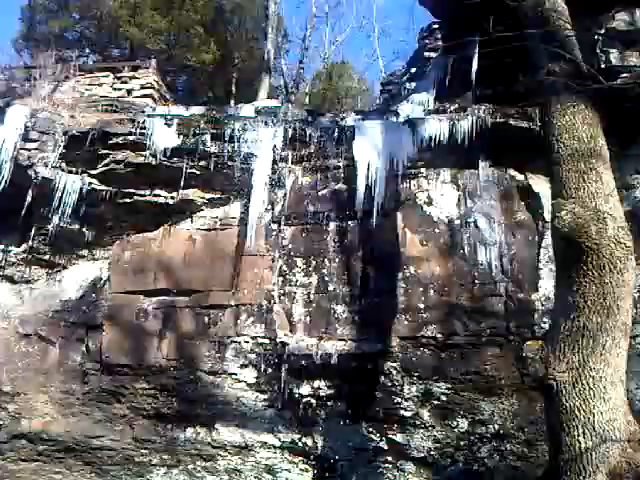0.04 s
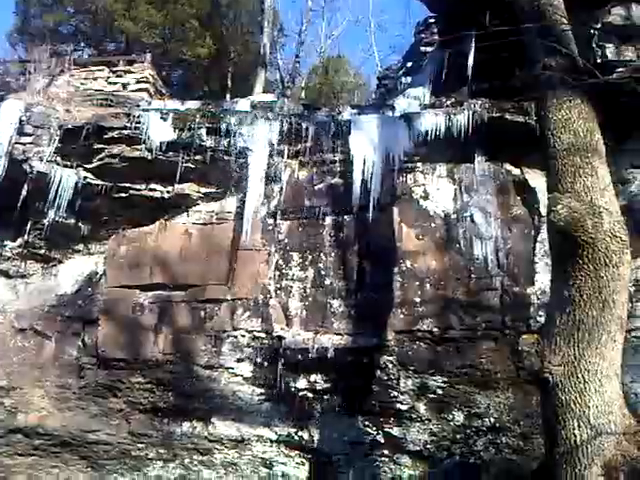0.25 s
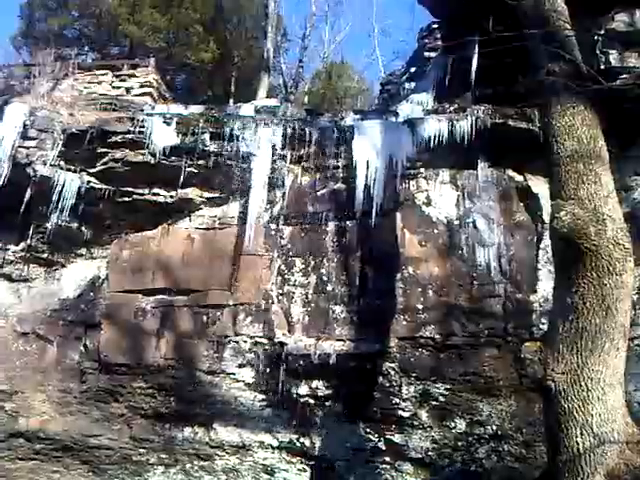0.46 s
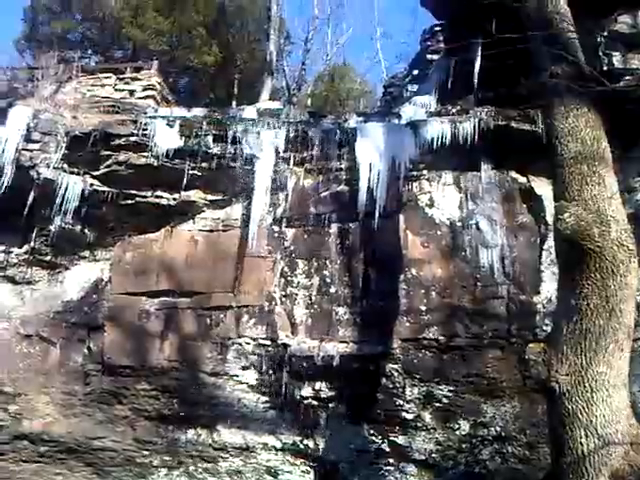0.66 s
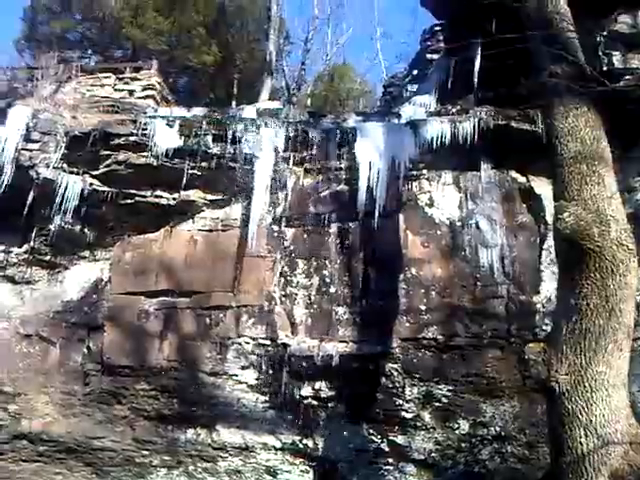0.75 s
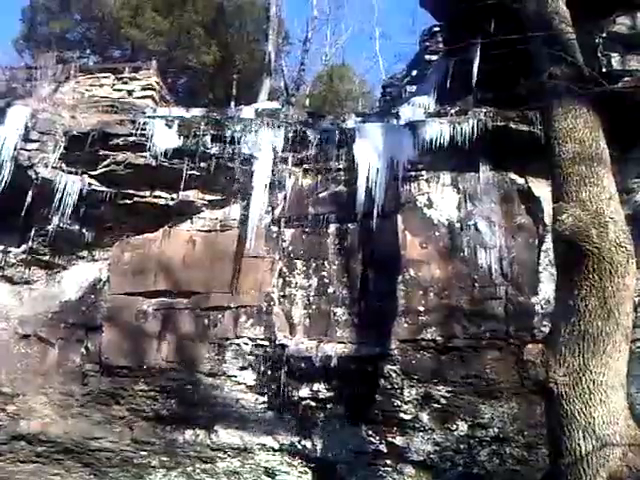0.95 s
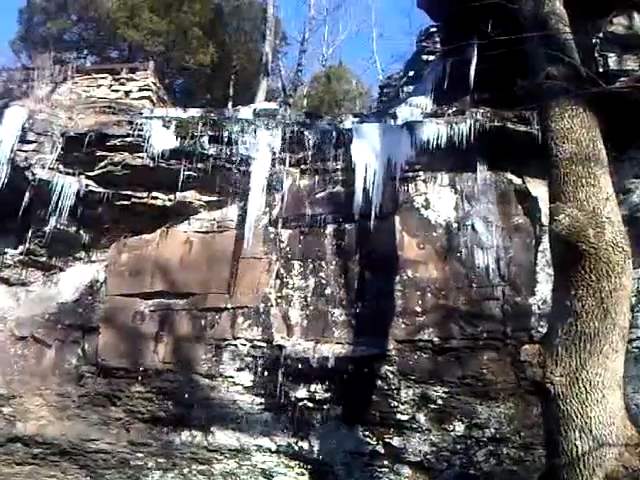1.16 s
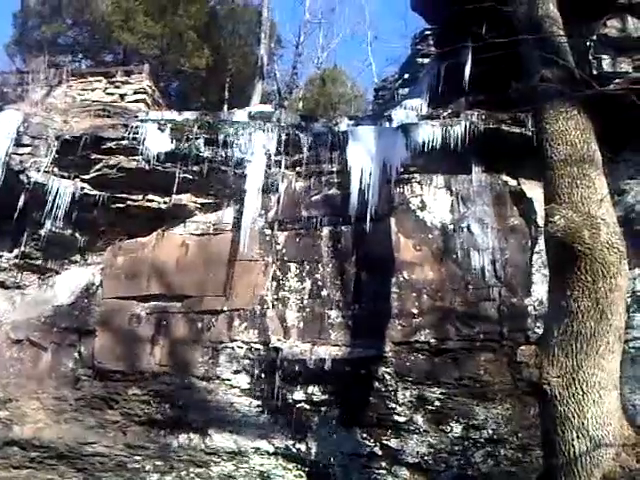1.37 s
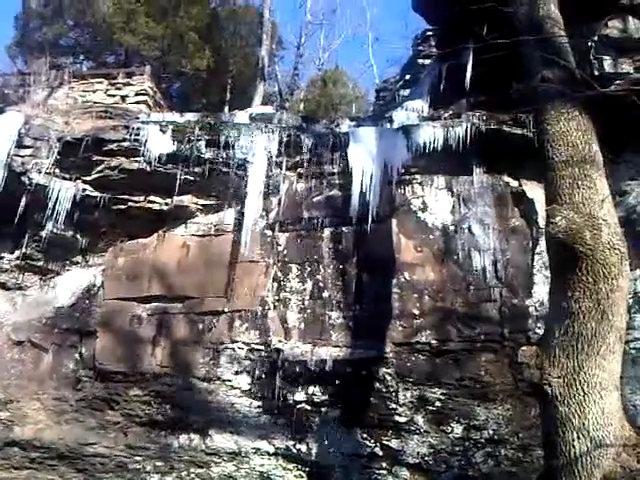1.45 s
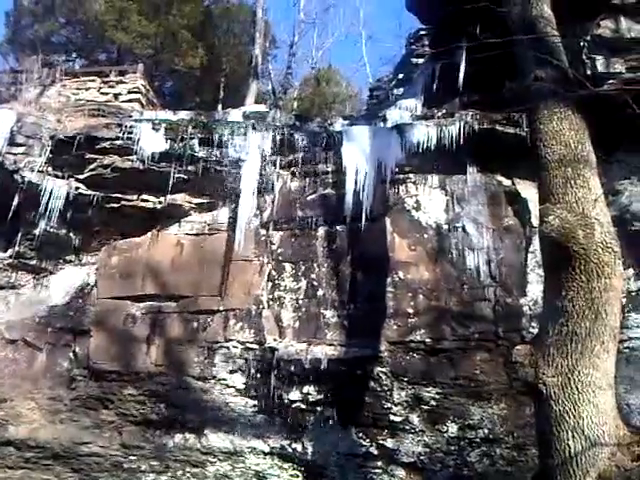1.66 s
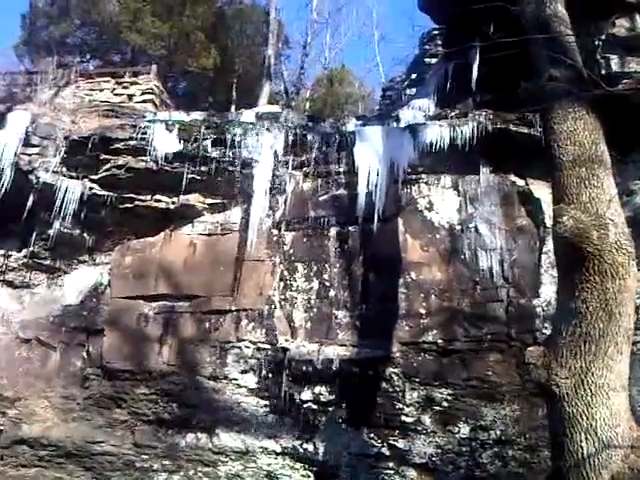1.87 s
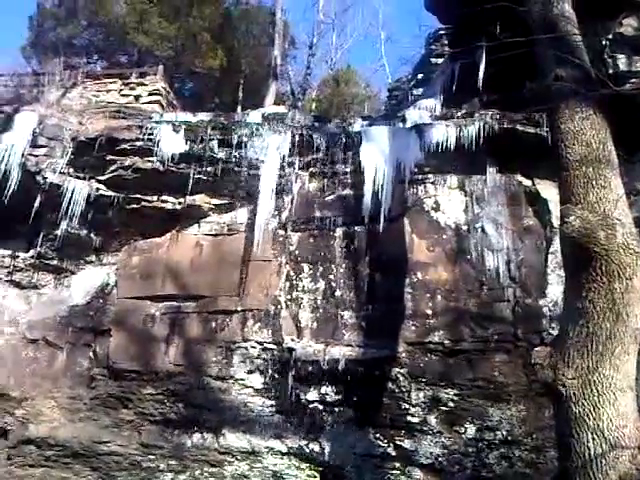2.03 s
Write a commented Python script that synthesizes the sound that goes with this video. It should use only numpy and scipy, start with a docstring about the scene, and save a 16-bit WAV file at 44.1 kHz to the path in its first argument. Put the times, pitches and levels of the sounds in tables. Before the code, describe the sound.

Steady waterfall noise at a rocky cliff, heard through a small camera microphone: silence first, a low soft thump as the sound opens, then quiet, even rushing water with dense fine spatter and occasional sharper drops.

```python
"""At a rocky cliff a thin waterfall drops past a camera microphone: steady rush, dense spatter, louder splats.
The microphone opens a moment after the start, as a finger bumps the camera body with a short dull thump.
The rush is coloured, patchy noise in a low and a high band; spatter and splats are short bursts of noise.
The thump is a set of brief pushes and pulls passed through a heavily damped resonance."""
import sys
import numpy as np
from scipy import signal
from scipy.fft import rfft, irfft, next_fast_len
from scipy.io import wavfile
from scipy.ndimage import uniform_filter1d, map_coordinates

SR = 44100
rng = np.random.default_rng(int(sys.argv[2]) if len(sys.argv) > 2 else 0)


def waveform_to_disk(signal):
    """Save audio, clipped to [-1, 1], as 16-bit WAV at the path in sys.argv[1]."""
    frames = np.transpose(np.atleast_2d(signal))
    scaled = np.clip(frames, -1, 1) * 32767
    samples = np.round(scaled).astype(np.int16)
    wavfile.write(sys.argv[1], SR, samples)


N = 92610  # length in samples, 2.1 s

# rms levels before the flow moves them (dB): low rush, high rush, near drops
BODY_DB, HISS_DB, SPATTER_DB = -54.5, -55.5, -58.5
SPLIT_HZ = 3150  # between the low and the high rush
DROPS_PER_S, DROP_SPREAD_DB, DROP_LIFE_S = 1100, 4.5, 0.0007  # rate before clumping
SPLAT_RISE_S, SPLAT_OCTAVES = 0.00042, 0.3  # attack and bandwidth of a splat
CASE_HZ, CASE_Q = 107, 0.59  # the heavily damped camera body
THUMP_TOP_HZ = 5000  # the thump gives little above this
OPEN_S, OPEN_RISE_S = 0.158, 0.014  # the microphone opens
TOP_HZ = 9000  # band limit of the camera


def amp(db):
    """Decibels to gain."""
    return 10 ** (np.asarray(db) / 20)


def unit(x):
    """Scale to rms 1."""
    return x / np.sqrt(np.mean(x ** 2) + 1e-20)


def wobble(rate):
    """A smooth random curve, rate knots a second."""
    knots = rng.standard_normal(int(N * rate / SR) + 4)
    return map_coordinates(knots, [np.arange(N) * rate / SR])


def filtered(x, response):
    """Filter x by a response of frequency in Hz, padded so that tails do not wrap round."""
    m = next_fast_len(N + SR // 2)
    return irfft(rfft(x, m) * response(np.fft.rfftfreq(m, 1 / SR)), m)[:N]


def thump():
    """A finger's short pushes and pulls on the camera body, which swings back once and settles."""
    # the finger catches, slips and lands: start_s, force_level_db, length_s, way (push +1, pull -1)
    bumps = [(.1583, -37, .0003, 1), (.1613, -22.5, .0006, 1), (0.162, -18, 0.00079, -1),
             (0.1634, -11.5, 0.0016, 1), (.2088, -41.5, 0.00076, -1)]
    t = np.arange(N) / SR
    force = np.zeros(N)
    for start_s, level_db, length_s, way in bumps:
        force += np.sign(way) * amp(level_db) * np.exp(-np.abs(t - start_s) / length_s)
    soft = filtered(force, lambda hz: 1 / (1 + (hz / THUMP_TOP_HZ) ** 4))

    def case(hz):
        """Acceleration of a damped mass on a spring."""
        return -hz ** 2 / (CASE_HZ ** 2 - hz ** 2 + 1j * hz * CASE_HZ / CASE_Q)

    return filtered(soft, case)


def colour(hz):
    """Gain of the water's spectrum, read on a log axis."""
    # the falling water as it reaches the camera: frequency_hz, density_db (dB per Hz, relative)
    water_spectrum = [(25, -25), (60, -23.5), (110, -15.5), (200, -6), (310, -8), (470, -10.5), (680, -5),
                      (870, -3.5), (1030, -8), (1330, -1), (1720, -5), (2220, 0), (2750, -7.5), (3400, -7),
                      (4080, -6.5), (4550, -2.5), (4850, -1.5), (5230, 1), (5900, -2), (6350, -4),
                      (7000, -12.5), (7450, -17.5), (8000, -28.5), (8550, -34), (9000, -48)]
    f, db = np.transpose(water_spectrum)
    return amp(np.interp(np.log(hz + 1), np.log(f + 1), db))


def treble_share(hz):
    """Share of the power that belongs to the high rush."""
    return 1 - 1 / (1 + (hz / SPLIT_HZ) ** 6)


def patchy(depth_db):
    """White noise with brief patches of random gain in time and frequency."""
    z = signal.stft(rng.standard_normal(N), nperseg=256)[2]
    field = uniform_filter1d(rng.standard_normal(z.shape), size=4, axis=0)  # over frequency
    field = uniform_filter1d(field, size=7, axis=1)  # over time
    return signal.istft(z * amp(depth_db * unit(field)), nperseg=256)[1][:N]


def rush(flow_db):
    """Countless far impacts merge into a low gurgle and a hiss that follows the flow."""
    body = filtered(patchy(depth_db=1.5), lambda hz: colour(hz) * np.sqrt(1 - treble_share(hz)))
    hiss = filtered(patchy(depth_db=-2.0), lambda hz: colour(hz) * np.sqrt(treble_share(hz)))
    body_gain = amp(BODY_DB + 0.5 * flow_db)  # the gurgle follows at half depth
    hiss_gain = amp(HISS_DB + flow_db + 0.37 * wobble(60))
    return unit(body) * body_gain + unit(hiss) * hiss_gain


def spatter(flow_db):
    """Near drops burst on the stone in clumps, each a tiny puff of bright noise."""
    hits = rng.random(N) < DROPS_PER_S / SR * amp(2.5 * wobble(40))
    sizes = amp(DROP_SPREAD_DB * np.clip(rng.standard_normal(N), -2, 2))
    # each hit adds power; its amplitude falls by 1/e in DROP_LIFE_S
    power = signal.lfilter([1], [1, -np.exp(-2 / (DROP_LIFE_S * SR))], hits * sizes ** 2)
    puffs = np.sqrt(power) * rng.standard_normal(N)
    drops = filtered(puffs, lambda hz: colour(hz) * (0.4 + treble_share(hz)))
    return unit(drops) * amp(SPATTER_DB + flow_db)


def splats():
    """Each slug of water slapping the rock is a quick burst of noise around its own pitch."""
    # slugs of water and big drops: start_s, peak_db, centre_hz (before the water's colour), fall_s
    slaps = [(0.297, -43, 2100, 0.005), (0.445, -38.5, 5100, 0.0013), (0.5927, -41.5, 5210, 0.0036),
             (0.8856, -40.5, 5500, 0.0036), (0.96, -42, 5530, 0.0031), (1.0415, -43, 2050, .002),
             (1.06, -41.5, 5450, 0.0056), (1.167, -43, 5300, 0.005), (1.19, -44, 2040, 0.0042),
             (1.29, -42, 6000, .003), (1.4025, -42, 5730, .003), (1.7162, -38, 5830, 0.0011),
             (1.7542, -35.5, 5600, 0.00078), (1.9731, -35, 5060, 0.00065)]
    out, t = np.zeros(N), np.arange(N) / SR
    for start_s, peak_db, centre_hz, fall_s in slaps:

        def band(hz):
            """A bell on the octave axis over a faint floor, in the water's colour."""
            octaves = np.log2((hz + 1) / centre_hz)
            return colour(hz) * (0.15 + np.exp(-0.5 * (octaves / SPLAT_OCTAVES) ** 2))

        age = np.maximum(t - start_s, 0)
        shape = (1 - np.exp(-age / SPLAT_RISE_S)) * np.exp(-age / fall_s)
        burst = filtered(shape * rng.standard_normal(N), band)
        out += amp(peak_db) * burst / np.abs(burst).max()
    return out


def scene():
    """The waterfall, heard from the moment the microphone opens, and the bump."""
    # the flow swells and eases: time_s, level_db (relative; in full on hiss and spatter)
    flow = [(.16, 0), (.35, -1), (.45, 1), (.62, 0.5), (.78, -0.4), (.92, 1.5), (1.12, -0.1), (1.29, 2.5),
            (1.35, -.8), (1.47, 1), (1.66, 0.45), (1.87, 0), (2.1, 1)]
    t = np.arange(N) / SR
    flow_db = np.interp(t, *np.transpose(flow))
    water = rush(flow_db) + spatter(flow_db) + splats()
    opening = np.clip((t - OPEN_S) / OPEN_RISE_S, 0, 1)
    return (water * opening + thump())[None]


def record(dry):
    """The camera cuts steeply above its band limit."""
    return filtered(dry[0], lambda hz: 1 / (1 + (hz / TOP_HZ) ** 120))[None]


dry = scene()
out = record(dry)
waveform_to_disk(out)
```